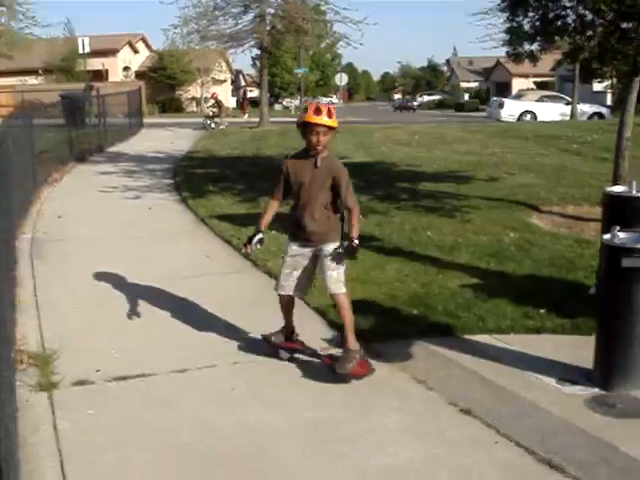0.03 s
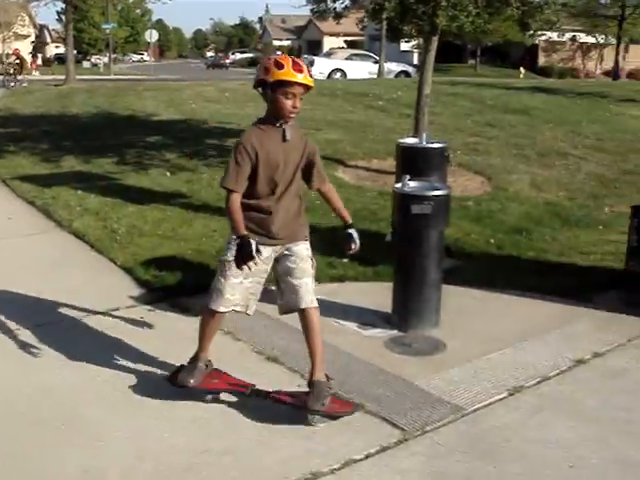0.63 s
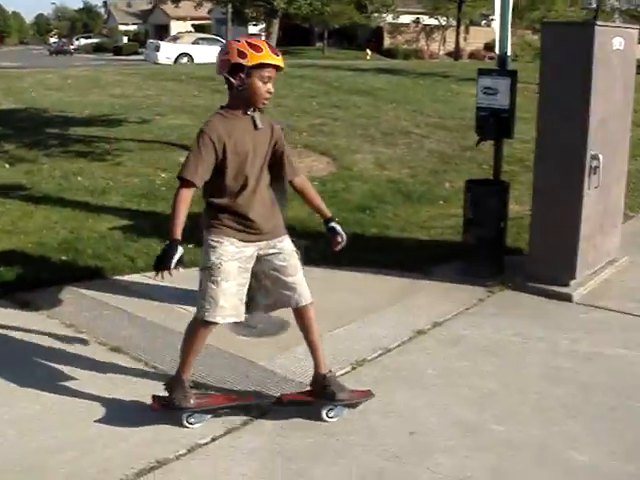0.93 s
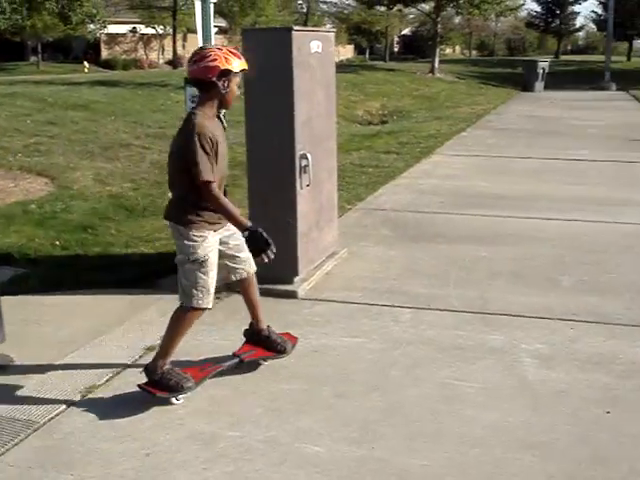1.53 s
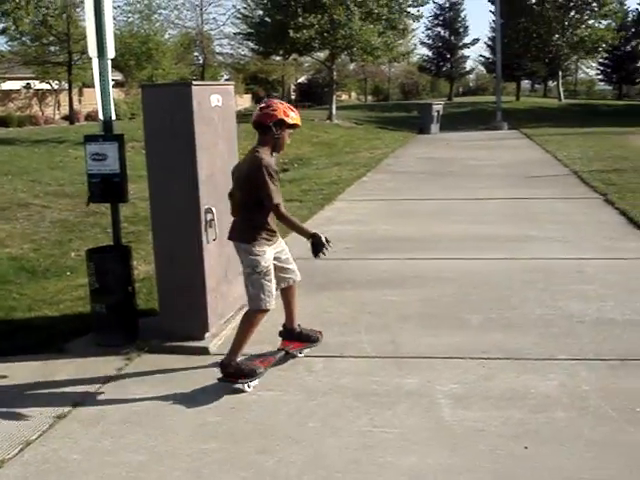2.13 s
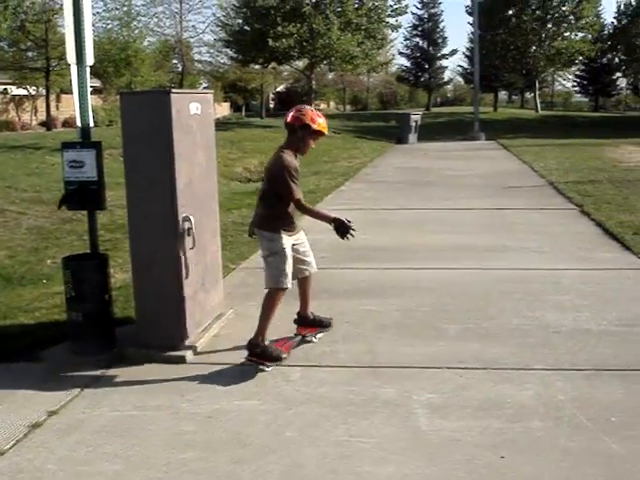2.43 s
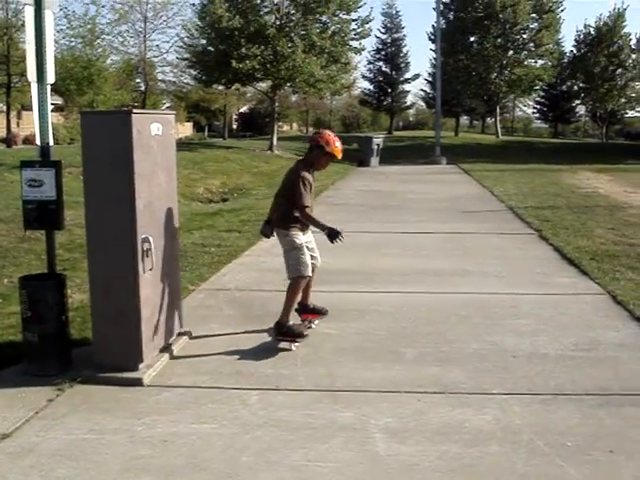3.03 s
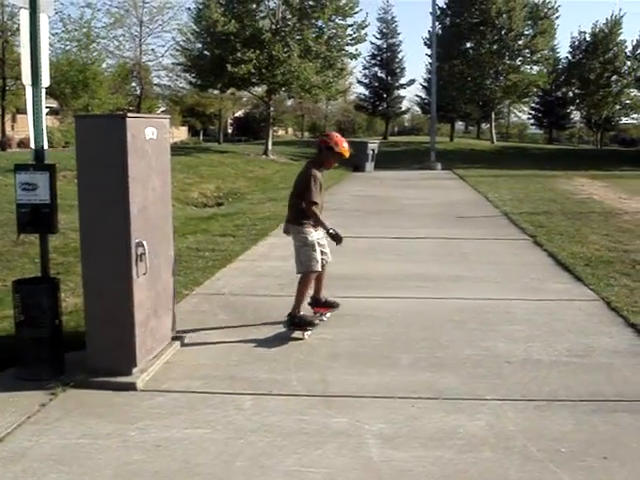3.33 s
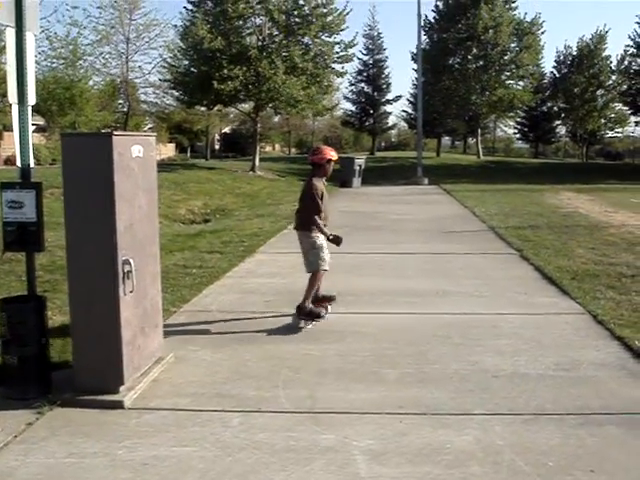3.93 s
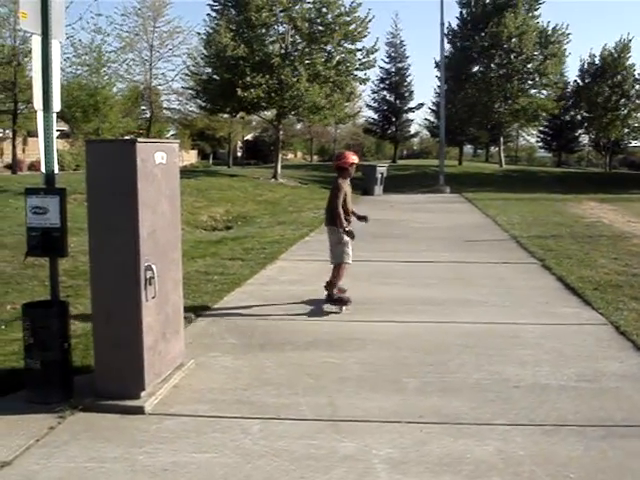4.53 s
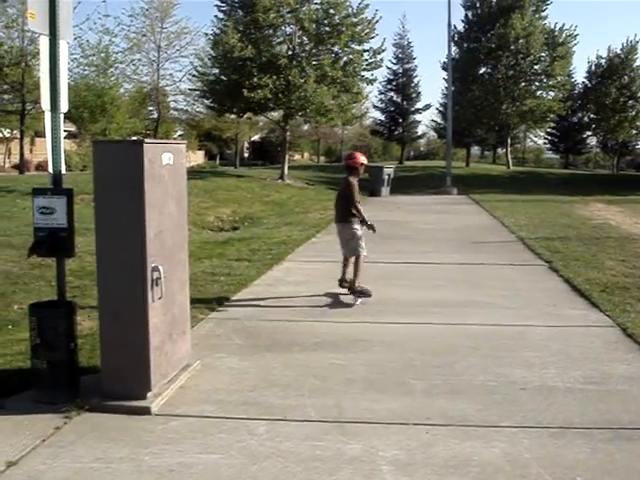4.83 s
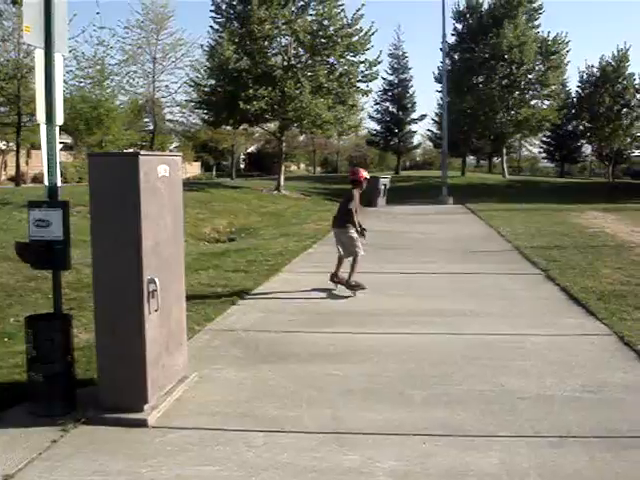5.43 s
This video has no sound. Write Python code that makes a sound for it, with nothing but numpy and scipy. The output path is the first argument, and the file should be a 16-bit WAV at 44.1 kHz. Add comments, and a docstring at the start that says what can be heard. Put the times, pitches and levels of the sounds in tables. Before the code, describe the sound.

A two-wheeled board rolls on a concrete path from the start, with a gritty rumble, a brief hum and a low, wavering whirr. It passes close to the microphone at around 1 to 1.5 seconds. The wheels clack hollowly over joints at about 0.1, 0.9, 1.1, 2.2 and 2.6 seconds, briefly ringing the plastic deck, and the casters rasp in swerves between 0.7 and 2.5 seconds. Soft puffs of air brush the microphone, over a faint, steady wash of distant traffic and leaves. From about 2.7 seconds, wind builds into loud, low, uneven buffeting that overloads the microphone with sharp pops, strongest near 3, 3.4, 3.8, 4.2 and 4.6 seconds. Beneath it the board knocks again at about 4 seconds and its rolling grows faint as it moves away. The gusts continue until the end, near 5.7 seconds.

```python
"""A gritty rolling rumble with hollow clacks: a child rides a two-wheeled caster board past the microphone
and away along a concrete park path. The wheels grind over the grain and knock across the joints, ringing
the plastic deck; a low whirr glides and the casters rasp in the swerves. Traffic and leaves lie far off.
Light puffs of air brush the microphone; from halfway, gusts buffet it and overload it with sharp pops."""
import sys
import numpy as np
from scipy import signal
from scipy.fft import rfft, irfft
from scipy.io import wavfile

SR = 44100
rng = np.random.default_rng(int(sys.argv[2]) if len(sys.argv) > 2 else 0)


def unload_audio(sound):
    """Save the sound as a 16-bit wav file, at the path given as the first command line argument."""
    columns = np.transpose(np.atleast_2d(sound))
    # keep every value between -1 and 1, then stretch to whole-number steps
    steps = np.round(np.clip(columns, -1, 1) * 32767)
    wavfile.write(sys.argv[1], SR, steps.astype(np.int16))


N = 251370

# the board nears, passes and rolls away: (time [s], rumble before its trim [dB], grit [dB])
RIDE_LEVELS = [(0, -34, -58), (.45, -33, -57.5), (1.1, -31.5, -58.5), (1.47, -31.5, -58.5),
               (1.68, -34.5, -60.5), (2.3, -32.5, -57.5), (2.7, -33.5, -60), (3.2, -31, -57),
               (3.65, -34, -58.5), (4.1, -43, -61.5), (5.1, -37.5, -61), (5.7, -44, -59.5)]
# the tyres scrub sideways in a swerve: (middle [s], half length [s], caster rasp [dB], grit [dB])
TYRE_SCRUBS = [(0.74, 0.09, -50.5, -52), (0.956, 0.15, -54.5, -55), (1.26, 0.16, -50, -67),
               (1.827, .06, -54, -66), (2.104, 0.14, -49, -61), (2.464, 0.065, -49, -68),
               (2.975, .1, -67, -55)]
# a wheel hits a joint or chip: (time [s], thud [dB], crack [dB], scrape decay [s], pitch [ratio])
JOINT_HITS = [(0.0978, -18, -28.5, 0.0041, 1.01), (0.1223, -28.5, -60, 0.0056, 1.05),
              (.860, -22.5, -28, .007, 1.097), (1.1098, -18, -22, .003, 1.05),
              (1.120, -24, -28.5, 0.0026, 1.23), (1.533, -41, -43.5, 0.0092, 1.07),
              (2.233, -21.5, -26, 0.0043, 1.034), (2.5816, -23, -31, 0.0031, 1.13),
              (4.046, -23, -43.5, 0.0053, 1.213), (4.387, -45, -44.5, .004, 1.53),
              (4.411, -31, -68, 0.0049, 1.05)]
USUAL_EDDY_HZ = 232


def from_db(db):
    """Decibels to gain."""
    return 10 ** (np.asarray(db) / 20)


def rms_one(x):
    """Scale to unit power."""
    return x / np.sqrt(np.mean(x ** 2) + 1e-20)


def in_time(rows):
    """The columns of an automation curve at every sample."""
    s, *columns = np.transpose(rows)
    return [np.interp(np.arange(N) / SR, s, c) for c in columns]


def at_hz(points, hz):
    """Read an EQ curve on a log-frequency axis."""
    freqs, db = np.transpose(points)
    return np.interp(np.log(hz + 1e-3), np.log(freqs), db)


def coloured(x, spectrum):
    """Shape a signal with an EQ curve; rms 1."""
    gain = from_db(at_hz(spectrum, np.fft.rfftfreq(N, 1 / SR)))
    return rms_one(irfft(rfft(x) * gain, N))


def cut(x, hz, kind, order=2):
    """Butterworth low-, high- or band-pass."""
    return signal.sosfilt(signal.butter(order, hz, kind, fs=SR, output="sos"), x)


def drift(rate_hz):
    """Smooth random modulation; rms 1."""
    rolloff = 1 + (np.fft.rfftfreq(N, 1 / SR) / rate_hz) ** 4
    return rms_one(irfft(rfft(rng.standard_normal(N)) / rolloff, N))


def narrow_noise(hz, width_hz):
    """A narrow band of noise whose centre glides; rms 1."""
    white = rng.standard_normal(N) + 1j * rng.standard_normal(N)
    rolloff = 1 + (np.fft.fftfreq(N, 1 / SR) / width_hz) ** 2
    shaking = np.fft.ifft(np.fft.fft(white) / rolloff)
    return rms_one(np.real(shaking * np.exp(2j * np.pi * np.cumsum(hz) / SR)))


def patter(per_s, size_db, cap):
    """Random clicks of either sign, the biggest cap * size_db above the smallest."""
    sizes = from_db(size_db * np.minimum(rng.exponential(1, N), cap)) * rng.choice([-1, 1], N)
    return sizes * (rng.random(N) < per_s / SR)


def evened(x, window_s):
    """Hold the short-term power of a noise near 1."""
    window = signal.windows.hann(int(2 * window_s * SR))
    power = signal.fftconvolve(x * x, window / window.sum(), "same")
    return x / np.sqrt(np.maximum(power, 1e-12))


def swell(middle_s, half_length_s):
    """A bell-shaped rise and fall of height 1."""
    return np.exp(-((np.arange(N) / SR - middle_s) / half_length_s) ** 2)


def burst(s, length_s, attack_s=0.0082, release_s=0.0093):
    """Envelope of one push of air: attack, hold, release."""
    t = np.arange(N) / SR
    outside = np.maximum(s - t, 0) / attack_s + np.maximum(t - s - length_s, 0) / release_s
    return np.exp(-np.minimum(outside, 20))


def board_body(force, pitch=1):
    """The force at the wheels rings all the board's resonances in parallel."""
    # wheel, caster and deck modes: (frequency at pitch 1 [Hz], width [Hz], gain [dB])
    modes = [(300, 170, -1.5), (475, 130, -2.5), (790, 197, 6.5), (978, 85, 10), (1110, 120, -4),
             (1350, 240, -4.5), (1790, 106, -3), (2830, 470, -4), (2760, 180, -0.5), (3420, 300, -8),
             (4790, 300, -10.5), (4970, 610, -17.5), (5780, 150, -12), (6380, 200, -22.5),
             (7800, 400, -23.5), (8800, 1900, -22.5)]
    out = 0
    for k, (hz, width, db) in enumerate(modes):
        r, w = np.exp(-np.pi * width / SR), 2 * np.pi * hz * pitch / SR
        ring = (1 - r * r) / 2 * signal.lfilter([1, 0, -1], [1, -2 * r * np.cos(w), r * r], force)
        out = out + (-1) ** k * from_db(db) * ring
    return out


def rolling(judder_db=1.5, body_db=-21.5, split_hz=2300, rumble_trim_db=-5.5):
    """Sand grains patter under the wheels, heard direct and through the board; grittier in a swerve."""
    # tone of tyre on concrete: (frequency [Hz], gain [dB])
    contact_eq = [(40, -4.5), (120, -3.5), (230, -3), (500, -5), (900, -2.5), (1300, -10.5), (2200, -14),
                  (3200, -13.5), (4500, -12), (6500, -16.5), (10000, -39)]
    rumble_db, grit_db = in_time(RIDE_LEVELS)
    scrub = sum(from_db(db) * swell(s, half_s) for s, half_s, _, db in TYRE_SCRUBS)
    grains = patter(per_s=2500, size_db=1.0, cap=4)
    judder = from_db(judder_db * drift(35))
    grind = judder * (from_db(body_db) * rms_one(board_body(grains)) + coloured(grains, contact_eq))
    rumble = rms_one(cut(grind, split_hz, "low", order=3))
    grit = rms_one(cut(grind, split_hz, "high", order=3))
    return from_db(rumble_db + rumble_trim_db) * rumble + np.hypot(from_db(grit_db), scrub) * grit


def wheel_hum(start_hz=463, sag_hz_per_s=11, width_hz=36, level_db=-45.5):
    """One wheel hums at the start, overtones only, sinking in pitch as it swells and fades."""
    # the hum's partials: (harmonic [number], level relative to level_db [dB])
    overtones = [(2, 2), (3, -2), (4, -9), (5, -11), (6, -13), (7, -15.5)]
    hz = start_hz - sag_hz_per_s * np.arange(N) / SR
    hum = sum(from_db(level_db + db) * narrow_noise(k * hz, width_hz) for k, db in overtones)
    return swell(0.22, 0.75) * hum


def whirr(relative_db=-17.5, waver_db=4.5):
    """A low, wavering whirr in the rolling sound glides down and up as the board passes."""
    # centre of the whirr: (time [s], frequency [Hz])
    glide = [(0, 948.5), (1.35, 905), (1.8, 719), (2.05, 736), (2.2, 925), (2.48, 769), (2.75, 919),
             (5.7, 987)]
    (hz,), (rumble_db, _) = in_time(glide), in_time(RIDE_LEVELS)
    return from_db(rumble_db + relative_db + waver_db * drift(8.7)) * narrow_noise(hz, width_hz=90)


def caster_rasp(relative_db=-29, width_hz=280, sheen_ratio=1.6, sheen_db=-14,
                chatter_hz=58, chatter_db=7, jitter=0.42):
    """The casters' high rasp swells in each swerve and chatters as the tyre grips and slips."""
    # centre of the rasp: (time [s], frequency [Hz])
    glide = [(0, 3250), (.75, 3635), (1.33, 3030), (1.48, 2540), (1.7, 3460), (5.7, 3320)]
    (hz,), (rumble_db, _) = in_time(glide), in_time(RIDE_LEVELS)
    scrub = sum(from_db(db) * swell(s, half_s) for s, half_s, db, _ in TYRE_SCRUBS)
    slips = np.cumsum(chatter_hz * (1 + jitter * drift(30))) / SR
    chatter = rms_one(from_db(chatter_db * np.cos(2 * np.pi * slips)))
    rasp = narrow_noise(hz, width_hz) + from_db(sheen_db) * narrow_noise(sheen_ratio * hz, width_hz)
    return np.hypot(from_db(rumble_db + relative_db), scrub) * chatter * rasp


def park(level_db=-45):
    """Distant traffic and leaves blur into a steady bed of noise."""
    # tone of the ambience: (frequency [Hz], gain [dB])
    ambience_eq = [(30, -11), (200, -3.5), (900, 3), (1500, -8), (3000, -15.5), (5000, -33), (7500, -24.5),
                   (10000, -27.5)]
    return from_db(level_db) * coloured(rng.standard_normal(N), ambience_eq)


def breeze(floor_db=-50):
    """Slow air on the microphone makes only a soft, low flutter."""
    # puffs of light air: (start [s], length [s], level [dB])
    puffs = [(0.412, 0.025, -39), (0.661, 0.031, -30.5), (.75, 0.04, -31), (.83, 0.22, -39.5),
             (1.265, 0.077, -38.5), (1.476, 0.076, -37.5), (1.9, .13, -42), (2.283, 0.053, -42)]
    # tone of the flutter: (frequency [Hz], gain [dB])
    flutter_eq = [(20, -10.5), (50, 1), (95, 3), (150, -3.5), (250, -20.5), (500, -42), (1000, -60)]
    power = from_db(floor_db) ** 2 + sum((from_db(db) * burst(s, hold_s)) ** 2 for s, hold_s, db in puffs)
    return np.sqrt(power) * evened(coloured(rng.standard_normal(N), flutter_eq), window_s=0.12)


def clack(thud_db, crack_db, decay_s, pitch, rise_s=.002, tyre_hz=7900, snap_db=-26, split_hz=2100):
    """One touch of a wheel on an edge: an impact and a short scrape, dulled by the soft tyre."""
    out, t = 0, np.arange(SR // 8) / SR
    scraping = rng.standard_normal(len(t)) * (1 - np.exp(-t / rise_s)) * np.exp(-t / decay_s)
    # the impact counts for more in the thud, the scraping in the crack
    for db, kind, scrape in ((thud_db, "low", 0.14), (crack_db, "high", 1.0)):
        force = cut((t == 0) + scrape * scraping, tyre_hz, "low", order=4)
        part = cut(board_body(force, pitch) + from_db(snap_db) * force, split_hz, kind, order=3)
        power = np.sum(part ** 2) / (.008 * SR)   # as if packed into 8 ms
        out = out + from_db(db) * part / np.sqrt(power)
    return out


def knocks(bounce_s=.008, loss_db=8.5, bounce_detune=0.18):
    """A wheel clacks on each joint and rebounds twice, weaker every time."""
    out = np.zeros(N)
    for s, thud_db, crack_db, decay_s, pitch in JOINT_HITS:
        for k in range(3):
            start = int((s + k * bounce_s * rng.uniform(.9, 1.1)) * SR)
            detune = 1 + bounce_detune * (k % 2)
            touch = clack(thud_db - k * loss_db, crack_db - k * loss_db, decay_s, pitch * detune)
            out[start:start + len(touch)] += touch
    return out


def deck_ring(base_hz=1013, width_hz=24, relative_db=-15):
    """Each knock leaves the hollow deck ringing briefly, softer than the thud."""
    out, t = np.zeros(N), np.arange(SR // 8) / SR
    for s, thud_db, _, _, pitch in JOINT_HITS:
        ring = np.sin(2 * np.pi * base_hz * pitch * t) * np.exp(-np.pi * width_hz * t)
        start = int(s * SR)
        out[start:start + len(t)] += from_db(thud_db + relative_db) * ring
    return out


def outdoors(x, wet_db=-17, t60_s=0.16, predelay_s=.012, dull_hz=4000):
    """A thin, short scatter off a fence, a cabinet and the ground."""
    t = np.arange(SR // 2) / SR
    tail = cut(rng.standard_normal(len(t)), dull_hz, "low") * from_db(-60 * t / t60_s) * (t > predelay_s)
    return x + from_db(wet_db) * signal.fftconvolve(x, tail / np.sqrt(np.sum(tail ** 2)))[:N]


def wind_flow(start_s=2.61, rise_s=0.78, steady_db=-25, lull_hz=168):
    """Wind level [dB] and eddy pitch [Hz]: gusts ride a steady flow, the strongest leading the pitch."""
    # gusts on the microphone: (start [s], length [s], level [dB], eddy pitch [Hz])
    gusts = [(2.694, 0.013, -21, 153), (2.774, 0.061, -21, 188), (2.908, 0.17, -17, 190),
             (2.968, 0.052, -8.5, 318), (3.183, 0.053, -21.5, 149), (3.278, 0.021, -13.5, 179),
             (3.339, 0.058, -11.5, 239), (3.403, 0.076, -18.5, 199), (3.578, 0.028, -16.5, 167),
             (3.629, .03, -14, 250), (3.699, 0.054, -16, 226), (3.759, 0.151, -10.5, 303),
             (3.971, 0.13, -17.5, 281), (4.126, 0.07, -12, 264), (4.195, 0.19, -19.5, 297),
             (4.311, 0.049, -14.5, 280), (4.453, 0.019, -14.5, 281), (4.533, 0.044, -12, 298),
             (4.604, 0.081, -10, 297), (4.687, 0.1, -22, 240), (4.881, 0.087, -21.5, 179),
             (5.021, 0.024, -13, 297), (5.065, .16, -20.5, 205), (5.156, 0.049, -12, 254),
             (5.242, 0.15, -11.5, 235), (5.441, 0.039, -16, 240), (5.54, 0.013, -21, 215),
             (5.662, 0.013, -16, 218)]
    risen = np.clip((np.arange(N) / SR - start_s) / rise_s, 0, 1)
    power = (from_db(steady_db) * risen) ** 2 + 1e-12
    weighted_hz = power * lull_hz
    for s, length_s, db, hz in gusts:
        gust = (from_db(db) * burst(s, length_s)) ** 2
        power += gust
        weighted_hz += gust * hz
    return 10 * np.log10(power), weighted_hz / power


def buffeting(wind_db, eddy_hz, lumps_db=2.5, flicker_octaves=0.16):
    """Turbulence at the microphone port: faster air sheds smaller eddies, shifting the spectrum up."""
    # tone at the usual eddy pitch: (frequency [Hz], gain [dB])
    gust_eq = [(20, -22), (50, -26.5), (100, -2.5), (170, 4), (260, 1), (400, -2), (600, -21), (900, -41),
               (1500, -53), (3000, -60.5), (9000, -69.5)]
    stretch = eddy_hz / USUAL_EDDY_HZ * 2 ** (flicker_octaves * drift(110))
    out, white = 0, rng.standard_normal((2, N))
    edges_hz = 20 * 2 ** (np.arange(18) / 2)   # half-octave bands
    for k, (low, high) in enumerate(zip(edges_hz, edges_hz[1:])):
        band = cut(white[k % 2], [low, high], "band", order=3)
        out = out + band * from_db(at_hz(gust_eq, np.sqrt(low * high) / stretch))
    return from_db(wind_db + lumps_db * drift(65)) * evened(out, window_s=0.014)


def crackle(wind_db, eddy_hz, low_hz=850, high_hz=1550, relative_db=-35.5, db_per_octave=24):
    """Fast air also sheds many tiny eddies, which crackle on top of the gust."""
    ticks = patter(per_s=300, size_db=6.0, cap=3) + 1e-18
    ticks = rms_one(cut(cut(ticks, low_hz, "high"), high_hz, "low", order=4))
    return ticks * from_db(wind_db + relative_db + db_per_octave * np.log2(eddy_hz / USUAL_EDDY_HZ))


def small_pops(wind_db, above_db=-15, relative_db=-3, centre_hz=480, spread_db=1.0, spread_octaves=.2):
    """Lesser pops come at random in strong wind: rows of (time [s], peak [dB], centre [Hz])."""
    tries = 260
    moments, chance = rng.integers(0, N, tries), rng.standard_normal((tries, 2))
    return [(i / SR, wind_db[i] + relative_db + spread_db * size, centre_hz * 2 ** (spread_octaves * pitch))
            for i, (size, pitch) in zip(moments, chance) if wind_db[i] > above_db]


def with_pops(wind, wind_db, dip_s=0.0017):
    """Sharp pops as gusts overload the microphone, the wind dipping briefly under each."""
    # the loudest pops: (time [s], peak [dB], centre [Hz])
    loud_pops = [(2.9816, -4, 1030), (2.992, -5, 440), (3.0152, -19, 590), (3.358, -4, 587),
                 (3.7813, -11, 716), (3.8079, -5, 920), (3.88, -9.5, 775), (4.042, -11.5, 775),
                 (4.1787, -5.5, 620), (4.346, -9, 630), (4.609, -8.5, 595), (4.623, -9, 754),
                 (5.185, -15, 436)]
    out, t = wind.copy(), np.arange(N) / SR
    for s, db, hz in small_pops(wind_db) + loud_pops:
        near = np.abs(t - s) < .01
        dt = t[near] - s
        phase = 2 * np.pi * hz * dt
        dip = 1 - np.exp(-(dt / dip_s) ** 2)
        pop = -phase * np.exp((1 - phase ** 2) / 2)   # one swing up, one down
        out[near] = out[near] * dip + from_db(db) * pop
    return out


def scene():
    """Board, park and wind at one microphone."""
    ambience = park()
    wind_db, eddy_hz = wind_flow()
    wind = breeze() + with_pops(buffeting(wind_db, eddy_hz), wind_db) + crackle(wind_db, eddy_hz)
    wheels = rolling() + wheel_hum() + whirr() + caster_rasp()
    clacks = outdoors(knocks() + deck_ring())
    return (wheels + clacks + ambience + wind)[None]


def record(dry, push_limit=.62, pull_limit=.72, hardness=4, cutoff_hz=9850):
    """The microphone overloads, sooner on a push than on a pull; the top end is cut steeply."""
    ceiling = np.where(dry > 0, push_limit, pull_limit)
    rounded = dry / (1 + np.abs(dry / ceiling) ** hardness) ** (1 / hardness)
    return signal.sosfilt(signal.ellip(12, .1, 80, cutoff_hz, fs=SR, output="sos"), rounded)


dry = scene()
out = record(dry)
unload_audio(out)
```